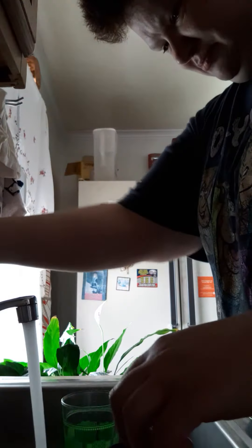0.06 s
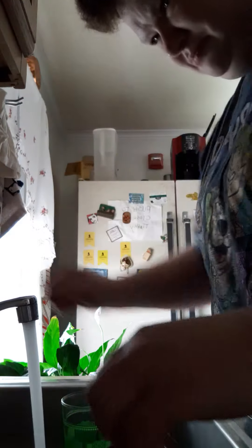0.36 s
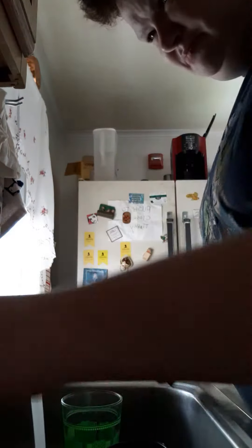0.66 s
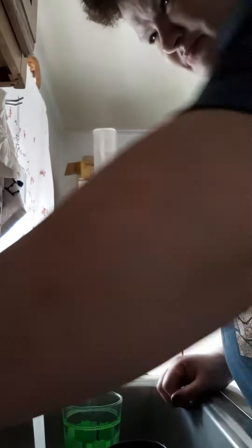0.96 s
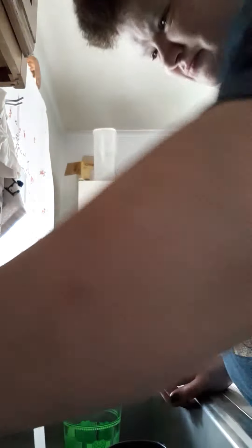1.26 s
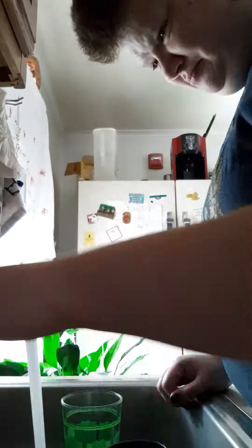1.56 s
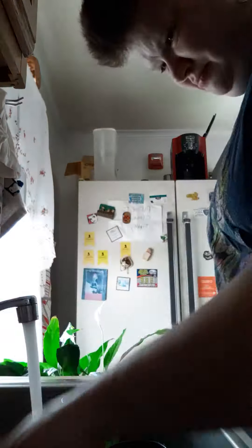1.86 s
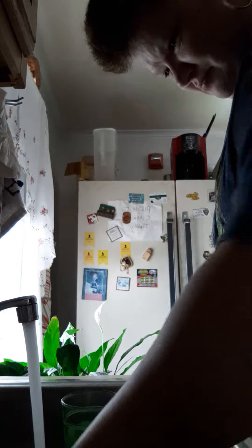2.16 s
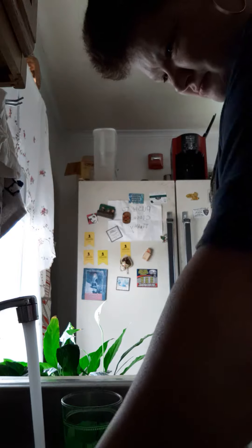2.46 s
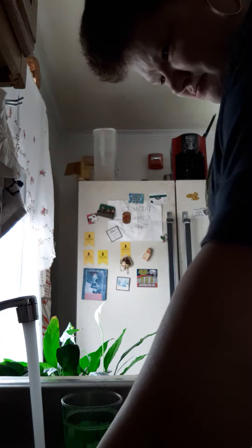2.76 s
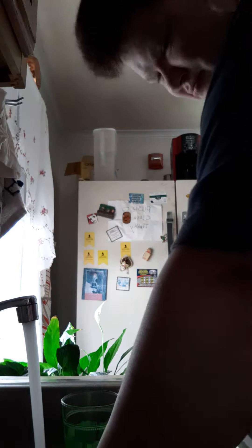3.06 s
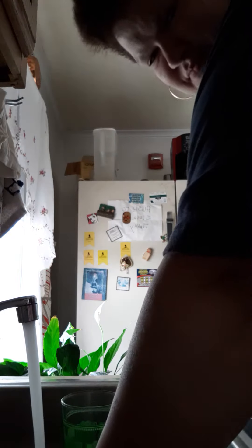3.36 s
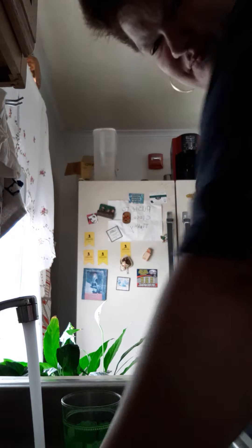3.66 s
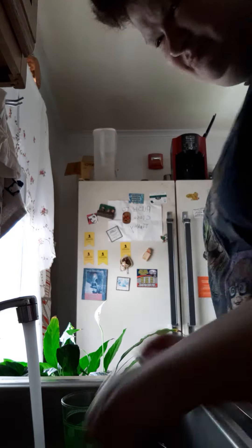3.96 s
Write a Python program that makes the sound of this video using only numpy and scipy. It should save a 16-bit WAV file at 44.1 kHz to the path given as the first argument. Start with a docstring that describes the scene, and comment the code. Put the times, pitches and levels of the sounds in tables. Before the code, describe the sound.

Tap water runs into a steel sink while a dish scrapes and clunks.

```python
"""At a steel kitchen sink, microphone close to the running tap.
The aerated jet hisses, spatters and drums on the basin; larger drops spit and water slops on the bottom.
A dish is shoved across the bottom into a clunk, then knocks and rattles against the steel.
Near the end a hand comes into the stream, and the spatter sinks to a soft wash for a while."""
import sys
import numpy as np
from scipy import signal
from scipy.fft import rfft, irfft, next_fast_len
from scipy.io import wavfile
from scipy.ndimage import uniform_filter1d, map_coordinates

SR = 44100
rng = np.random.default_rng(int(sys.argv[2]) if len(sys.argv) > 2 else 0)


def bounce(signal):
    """Save signal as a 16-bit WAV file at the path given by the first command-line argument."""
    frames = np.transpose(np.atleast_2d(signal))
    limited = np.clip(frames, -1, 1)
    pcm = np.round(limited * 32767).astype(np.int16)
    wavfile.write(sys.argv[1], SR, pcm)


N = 176400

# the tap's stream (time [s], spatter level [dB], hiss level [dB], drumming level [dB])
STREAM_LEVELS = [(0, -24, -22, -44), (1.25, -24.5, -21.5, -40), (1.6, -25.5, -24, -41),
                 (2.1, -28.5, -25.5, -45.5), (2.6, -27, -24.5, -50), (3.05, -32, -30.5, -56.5),
                 (3.25, -42, -39.5, -56.5), (3.65, -45.5, -39.5, -66.5), (3.8, -47, -32.5, -51),
                 (4, -39, -27.5, -51.5)]
# water washing over hand and dishes (time [s], level [dB])
WASH_LEVELS = [(0, -34), (1.2, -34.5), (2.2, -37), (3.1, -36.5), (3.62, -39), (4, -33)]
# spectra of spray on steel, the jet and the wash (frequency [Hz], relative level [dB])
SPATTER_SPECTRUM = [(500, -31.5), (1200, -20.5), (2300, -17.5), (3200, -8), (5700, -6), (6300, 0.5),
                    (6850, 0), (7600, -13), (15500, -17.5)]
HISS_SPECTRUM = [(3000, -20), (7800, -15), (9500, -6.5), (12000, -0.5), (15200, 2.5)]
WASH_SPECTRUM = [(40, -18), (150, -13), (270, -14), (700, 1), (1050, -5.5), (1700, 3), (2150, 0.5),
                 (2700, 4.5), (4700, -7.5), (5900, -10), (6700, 6), (7700, -7), (9000, -3.5), (15500, -9.5)]
# resonances of the wet basin (frequency [Hz], width [Hz], relative level [dB])
BASIN_MODES = [(57.6, 7.6, -13.5), (123.2, 7.1, 5), (187, 26, -4.5), (364.5, 37.5, -1.5), (594, 19, -5.5),
               (1213, 260, -9)]
# sharp spits of spray (time [s], level [dB])
SPIT_EVENTS = [(0.093, -14), (0.32, -20), (0.586, -12.5), (0.659, -28), (0.744, -13.5), (0.872, -14),
               (1.062, -14), (2.748, -17), (2.828, -23)]
# slops on the bottom of the sink (time [s], pitch [Hz], level [dB])
PLOP_EVENTS = [(.19, 900, -24), (.256, 405, -21), (0.247, 1290, -24), (0.336, 690, -26),
               (0.827, 1060, -28.5), (.99, 690, -24), (1.481, 372, -29), (1.696, 1250, -25),
               (1.752, 1250, -25.5), (2.056, 382, -29), (2.21, 1200, -23.5)]
# the shoved dish (time [s], rasp level [dB], groan level [dB])
SHOVE_LEVELS = [(1.08, -53, -42), (1.15, -31, -44.5), (1.24, -33, -29), (1.266, -18.5, -29),
                (1.28, -11.5, -23), (1.3, -23.5, -22.5), (1.33, -43, -38), (1.38, -65, -42)]
# resonances of the dish's rasp and the sink's groan (frequency [Hz], width [Hz], relative level [dB])
RASP_MODES = [(1164, 67, -0.5), (1390, 170, 0.5), (1940, 270, 0), (2800, 140, 0.5)]
GROAN_MODES = [(129, 25, -4), (397, 35, 2.5), (455.4, 7.1, 3), (624, 130, -3.5)]
# where the colour of a blow is set (frequency [Hz])
CONTACT_HZ = [125, 560, 830, 1600, 4800, 6800]
# dish against sink (time [s], share of free ringing time [0-1], level at each of CONTACT_HZ [dB])
KNOCK_EVENTS = [(1.286, 1, -22, -16, -35.5, -16, -25, -34), (2.29, 0.67, -18, -18, -36, -15.5, -31.5, -24),
                (2.375, 0.56, -35, -23, -24, -20.5, -20.5, -12.5),
                (2.467, 1, -6.5, -17, -18.5, -17.5, -22, -24.5),
                (2.481, 0.82, -11.5, -21.5, -19.5, -23.5, -18, -29.5),
                (2.521, 0.64, -28, -34, -16, -22, -36, -25),
                (2.552, 0.54, -20.5, -22.5, -13.5, -6.5, -27.5, -51)]
# ringing of sink and dish (frequency [Hz], relative level [dB], free T60 [s])
RING_MODES = [(122.5, 1.5, 0.42), (371, -2.5, 0.1), (455, -10, 0.18), (575, 0.5, 0.22), (630, -9, 0.27),
              (706, 1, 0.11), (830, -1.5, 0.13), (928, -4, 0.16), (1205, -2.5, 0.067), (1366, 1, 0.089),
              (1813, 7.5, 0.058), (4710, -0.5, 0.26)]
# colour of the clack (frequency [Hz], relative level [dB])
CLACK_SPECTRUM = [(170, 0.5), (280, -11.5), (600, 2), (1500, -5), (3500, 2.5), (6800, 5), (8000, -15),
                  (15000, -8)]
# decay of the undamped clack and of the room (frequency [Hz], T60 [s])
CLACK_DECAY = [(150, 0.24), (1500, 0.16), (12000, 0.13)]
ROOM_DECAY = [(100, 0.52), (15000, 0.082)]
# where the water sits at the microphone (frequency [Hz], left minus right [dB])
WATER_BALANCE = [(500, -4), (2000, -1), (3500, -3), (6300, 0), (15000, -1)]
# likeness of left and right (frequency [Hz], correlation [0-1])
COHERENCE = [(100, 1), (400, 1), (1100, 0.64), (3000, 0.026)]

HISS_PAN_DB, DISH_PAN_DB = -26, -3.5  # left minus right


def amp(db):
    """Decibels to gain."""
    return 10 ** (np.asarray(db) / 20)


def unit(x):
    """Scaled to rms 1."""
    return x / np.sqrt(np.mean(x ** 2) + 1e-20)


def along(points, hz):
    """A (frequency, value) table read on a log axis."""
    freqs, values = np.transpose(points)
    return np.interp(np.log(hz + 1), np.log(freqs + 1), values)


def curves(rows, outside=None):
    """One value per sample for each column after the time."""
    times, *columns = np.transpose(rows)
    return [np.interp(np.arange(N) / SR, times, column, outside, outside) for column in columns]


def wobble(rate):
    """A smooth random curve, rate knots a second."""
    return map_coordinates(rng.standard_normal(2048), [np.arange(N) * rate / SR], mode="wrap")


def filtered(x, response):
    """x through a frequency response."""
    n = x.shape[-1]
    size = next_fast_len(n + SR // 4)
    return irfft(rfft(x, size) * response(np.fft.rfftfreq(size, 1 / SR)), size)[..., :n]


def coloured(x, spectrum):
    """x shaped by a spectrum, rms 1."""
    return unit(filtered(x, lambda hz: amp(along(spectrum, hz))))


def resonate(x, modes):
    """x through resonances of alternating sign, rms 1."""
    def response(hz):
        return sum((-1) ** k * amp(db) * 1j * hz * width / (centre ** 2 - hz ** 2 + 1j * hz * width)
                   for k, (centre, width, db) in enumerate(modes))
    return unit(filtered(x, response))


def causal(x, spectrum, size=4096):
    """A short sound through a minimum-phase colour."""
    cepstrum = irfft(np.log(amp(along(spectrum, np.fft.rfftfreq(size, 1 / SR)))))
    cepstrum[1:size // 2] *= 2
    cepstrum[size // 2 + 1:] = 0
    return signal.fftconvolve(x, irfft(np.exp(rfft(cepstrum)))[None], axes=1)


def pan(db):
    """Left and right gains for a level difference."""
    return unit(amp(np.array([np.atleast_1d(db), -np.atleast_1d(db)]) / 2))


def stereo_angle(hz):
    """Turn from mid towards side, in radians."""
    return np.arccos(np.clip(along(COHERENCE, hz), -1, 1)) / 2


def spread(pair):
    """Two signals to stereo: alike in the bass, unrelated in the treble."""
    mid, side = filtered(pair, lambda hz: np.array([np.cos(stereo_angle(hz)), np.sin(stereo_angle(hz))]))
    return np.array([mid + side, mid - side])


def dying(x, t60s):
    """Each frequency of x dies at its own speed."""
    hz, t, bands = signal.stft(x, SR, nperseg=128)
    decay = amp(-60 * t / along(t60s, hz)[:, None])
    return signal.istft(bands * decay, SR, nperseg=128)[1][:, :x.shape[1]]


def add(track, start, sound):
    """Mix a sound into the track at start seconds."""
    part = track[:, round(start * SR):][:, :sound.shape[-1]]
    part += sound[..., :part.shape[1]]


def impacts(rate, scatter_db):
    """Two showers of random impacts of uneven size, rate a second."""
    hits = (rng.random((2, N)) < rate / SR) * rng.choice([-1, 1], (2, N))
    return unit(hits * amp(scatter_db * np.clip(rng.standard_normal((2, N)), -2, 2)))


def sink_walls(x, t60):
    """Dense reflections between the walls of the sink, different on each side."""
    t = np.arange(SR // 20) / SR
    echo = unit(rng.standard_normal((2, len(t))) * amp(-60 * t / t60)) / np.sqrt(len(t))
    echo[:, 0] += 1.1  # direct path to the microphone
    return unit(signal.fftconvolve(x, echo, axes=1)[:, :N])


def bubbling(x, depth_db):
    """Narrow bands swell and fade as clusters of bubbles come and go."""
    bands = signal.stft(x, nperseg=1024)[2]
    swell = uniform_filter1d(rng.standard_normal(bands.shape[1:]), size=5, axis=0)
    swell = uniform_filter1d(swell, size=5, axis=1)
    return unit(signal.istft(bands * amp(depth_db * unit(swell)), nperseg=1024)[1][:, :N])


def spatter(level_db):
    """Fine spray strikes the steel in quick surges."""
    spray = bubbling(sink_walls(impacts(rate=5600, scatter_db=7), t60=0.069), depth_db=3.0)
    return coloured(spray, SPATTER_SPECTRUM) * amp(level_db + 1.4 * wobble(70) + 0.72 * wobble(22.59))


def jet_hiss(level_db):
    """The aerated jet gives a bright, fluttering hiss."""
    fizz = bubbling(rng.standard_normal((2, N)), depth_db=2.5)
    return coloured(fizz, HISS_SPECTRUM) * amp(level_db + 0.95 * wobble(90))


def basin_drum(level_db):
    """The jet beats on the wet basin and stirs its low resonances."""
    beats = spread(impacts(rate=400, scatter_db=1.5))
    return resonate(beats, BASIN_MODES) * amp(level_db + 1.7 * wobble(22.18))


def wash(level_db):
    """A film of water runs over hand and dishes in many small, even splashes."""
    film = bubbling(sink_walls(impacts(rate=7000, scatter_db=2.5), t60=0.063), depth_db=2.5)
    return coloured(spread(film), WASH_SPECTRUM) * amp(level_db)


def spits(t60=0.015, attack_s=0.00019):
    """Larger drops burst on the steel."""
    out, t = np.zeros((2, N)), np.arange(SR // 10) / SR
    for start, db in SPIT_EVENTS:
        burst = coloured(rng.standard_normal((2, len(t))), SPATTER_SPECTRUM)
        add(out, start, burst * amp(db - 60 * t / t60) * (1 - np.exp(-t / attack_s)))
    return out


def plops(t60=0.073, attack_s=0.0041, relative_width=0.25):
    """Water slops on the bottom, each slop a hollow burst around its own pitch."""
    out, t = np.zeros((2, N)), np.arange(SR // 8) / SR
    for start, hz, db in PLOP_EVENTS:
        hollow = resonate(rng.standard_normal((2, len(t))), [(hz, relative_width * hz, 0)])
        add(out, start, hollow * amp(db - 60 * t / t60) * (1 - np.exp(-t / attack_s)))
    return spread(out) * pan(DISH_PAN_DB)


def dish_shove():
    """The dish judders over the bottom: its slips rasp, then the sink groans."""
    rasp_db, groan_db = curves(SHOVE_LEVELS, outside=-120)
    slips = spread(impacts(rate=2900, scatter_db=3.0))
    rasp = resonate(slips, RASP_MODES) * amp(rasp_db)
    groan = resonate(slips, GROAN_MODES) * amp(groan_db)
    return (rasp + groan) * pan(DISH_PAN_DB)


def dish_knocks(ring_db=-6.5, clack_db=8, attack_s=0.0008, panel_cut_hz=142):
    """Every blow clacks and rings the same modes, coloured by the contact and damped by the hand."""
    out, t = np.zeros((2, N)), np.arange(SR * 3 // 4) / SR
    for start, free, *contact_db in KNOCK_EVENTS:
        ring = 0
        for k, (hz, db, t60) in enumerate(RING_MODES):
            phases = rng.normal(0, 1, (2, 1)) * stereo_angle(hz)
            ring += (-1) ** k * amp(db - 60 * t / (free * t60)) * np.sin(2 * np.pi * hz * t + phases)
        noise = coloured(spread(rng.standard_normal((2, len(t)))), CLACK_SPECTRUM)
        clack = dying(noise, np.multiply(CLACK_DECAY, [1, free]))
        blow = (amp(ring_db) * ring + amp(clack_db) * clack) * (1 - np.exp(-t / attack_s))
        add(out, start, causal(blow, list(zip(CONTACT_HZ, contact_db))))
    bass_cut = signal.butter(4, panel_cut_hz, "high", fs=SR, output="sos")
    return signal.sosfilt(bass_cut, out) * pan(DISH_PAN_DB)


def kitchen(x, level_db=-13.5):
    """The short tail of a small room, longest in the bass."""
    tail = dying(rng.standard_normal((2, SR // 2)), ROOM_DECAY)
    tail /= np.linalg.norm(tail[0])
    return amp(level_db) * spread(signal.fftconvolve(x, tail, axes=1)[:, :N])


def scene():
    """The stream up close, its hiss hard right; dish and slops a little right, with the room behind."""
    bumps = dish_knocks() + dish_shove() + plops()
    spatter_db, hiss_db, drum_db = curves(STREAM_LEVELS)
    wash_db, = curves(WASH_LEVELS)
    spray = spatter(spatter_db)
    hiss = jet_hiss(hiss_db) * pan(HISS_PAN_DB)
    water = spray + basin_drum(drum_db) + wash(wash_db) + spits()
    water = filtered(water, lambda hz: pan(along(WATER_BALANCE, hz)))
    return water + hiss + bumps + kitchen(bumps)


def record(dry, port_lag_s=0.0002356, low_cut_hz=30, top_hz=15850):
    """A microphone with two spaced ports: bass roll-off, clipping at full scale, then the band limit."""
    def response(hz):
        lag = np.exp(np.array([[-1j], [1j]]) * np.pi * hz * port_lag_s)  # the left port hears it later
        return lag * (1j * hz / (1j * hz + low_cut_hz)) ** 2
    ports = filtered(dry, response)
    return filtered(np.clip(ports, -1, 1), lambda hz: hz < top_hz)


dry = scene()
out = record(dry)
bounce(out)
```